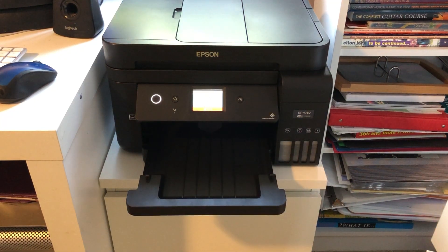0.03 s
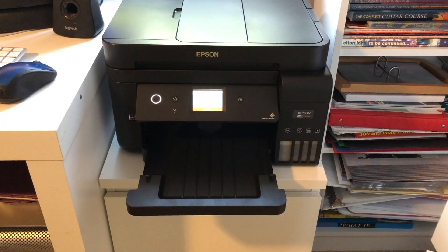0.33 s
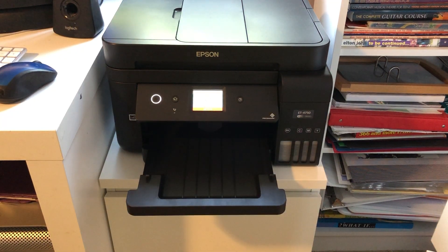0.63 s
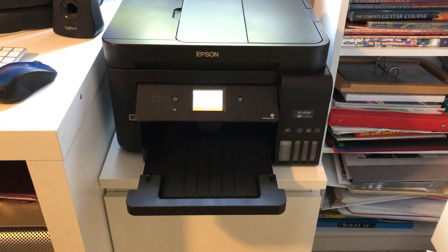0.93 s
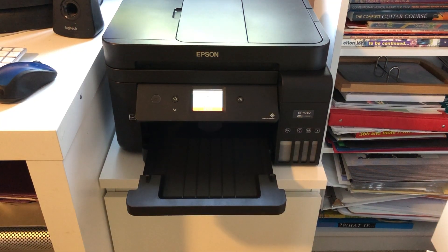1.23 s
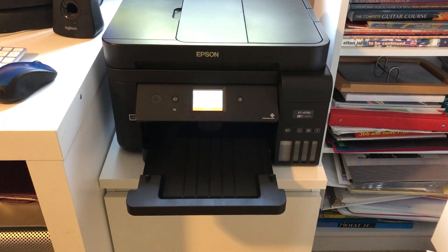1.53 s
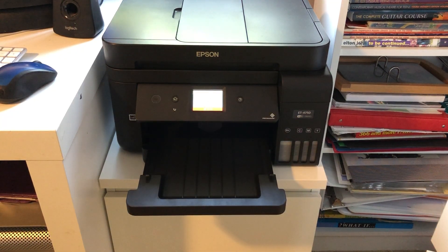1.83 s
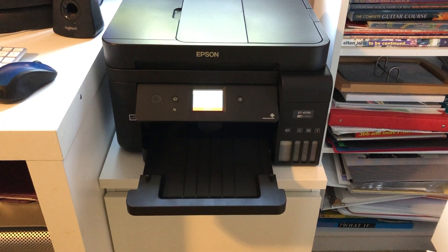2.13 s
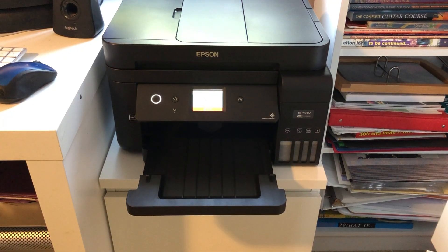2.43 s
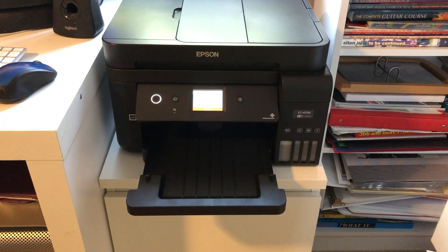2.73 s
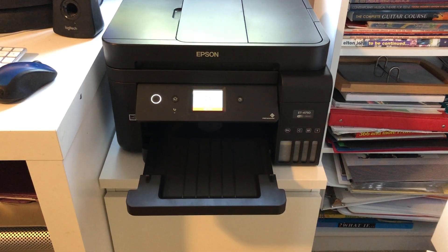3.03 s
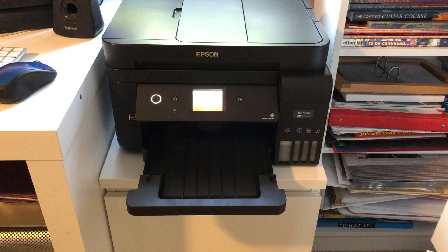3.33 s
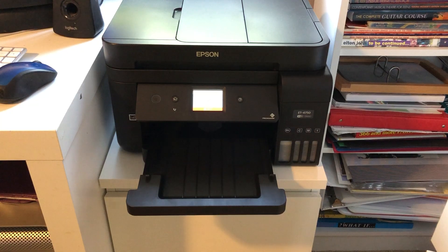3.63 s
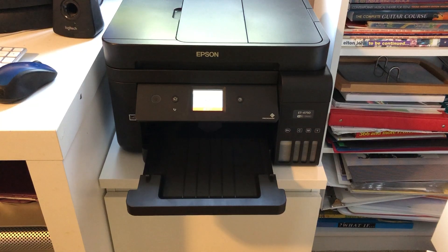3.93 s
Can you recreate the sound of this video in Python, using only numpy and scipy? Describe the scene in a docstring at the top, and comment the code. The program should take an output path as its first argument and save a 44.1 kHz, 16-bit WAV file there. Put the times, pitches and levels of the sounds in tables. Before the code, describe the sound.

An inkjet printer whirs, clicks and clacks over a low hum in a small room.

```python
"""In a small office, an inkjet printer on a cabinet works through its start-up moves.
A quiet feed motor turns; the gear train whirs in two fast runs and a slower one, its tones set by
shaft speed and its noise by tooth friction. Latches and carriage stops excite damped resonances of
the plastic housing, and the carriage glides. The cabinet rumbles and low partials beat in a throbbing
hum. A faint sizzle tops the room air, and the driver electronics whine while a motor is held."""
import sys
import numpy as np
from scipy import signal
from scipy.fft import rfft, irfft
from scipy.io import wavfile
from scipy.ndimage import uniform_filter1d

SR = 44100
rng = np.random.default_rng(int(sys.argv[2]) if len(sys.argv) > 2 else 0)


def persist_wave(psi):
    """Save psi, clipped to +-1, as 16-bit WAV."""
    counts = np.round(np.clip(psi, -1, 1) * 32767).astype(np.int16)
    wavfile.write(sys.argv[1], SR, np.atleast_2d(counts).T)


N = 176400
T = np.arange(N) / SR

# gear and motor partials at full speed and reference effort: pitch_hz, level_db
GEAR_PARTIALS = [(420, -63.5), (546, -59.5), (716, -59.5), (785, -58), (945, -61), (1092.5, -55.5),
                 (1177, -61.5), (1568, -65.5), (1638, -62), (2746, -67), (3090, -66.5), (3408, -76),
                 (3671, -68), (4377, -83)]
# gear frame resonances: pitch_hz, width_hz, relative_db
FRAME_RESONANCES = [(1619, 41, 1), (2820, 100, 2.5), (3310, 180, -0.5), (4444, 110, -6)]
REFERENCE_EFFORT_DB, FRAME_DB, RATTLE_DB = -43.5, -9.5, 0.96
def gear_train(runs, spectrum, friction_db, partials_db=0, speed=1):
    """Gear meshing: partials scale with shaft speed, while tooth friction drives the frame's modes."""
    effort = sum(level(run) * switched(run[0][0], run[-1][0]) for run in runs)
    clock = speed * wavering_clock(wobble=0.0026, rate_hz=8.2)
    rattle = rms_one(from_db(RATTLE_DB * drift(rate_hz=120)))
    partials = tones(GEAR_PARTIALS, clock, flutter_db=-1, flutter_hz=8.7)
    rubbing = noise(spectrum) + from_db(FRAME_DB) * ringing(FRAME_RESONANCES)
    friction = from_db(friction_db) * rattle * rubbing
    return effort * (friction + from_db(partials_db - REFERENCE_EFFORT_DB) * partials)


# effort of the gear train in each run: time_s, effort_db
FIRST_EFFORT = [(0.585, -47.5), (0.62, -42.5), (0.72, -43.5), (0.8, -44), (1.025, -44.5)]
SECOND_EFFORT = [(1.075, -44), (1.36, -44), (1.6, -42), (1.76, -43), (1.825, -50)]
SLOW_EFFORT = [(3.585, -52.5), (4.0, -51.5)]
# tooth friction spectra: frequency_hz, relative_db
FAST_SPECTRUM = [(340, -14), (410, -6.5), (470, -12), (640, -1), (790, -7.5), (860, -9), (1080, -6.5),
                 (1420, -9.5), (1700, -13.5), (2200, -16), (2950, -13.5), (4800, -17.5), (6500, -25),
                 (11000, -33.5), (15500, -36.5)]
SLOW_SPECTRUM = [(230, 6.5), (330, -23), (410, -11.5), (640, -1.5), (1100, -4), (2280, -15.5), (3300, -10),
                 (8500, -28.5), (15500, -36)]
def gear_runs():
    """Pitch is proportional to rotation rate: two fast runs, then a slower, lower one."""
    fast = gear_train([FIRST_EFFORT, SECOND_EFFORT], FAST_SPECTRUM, friction_db=-3)
    slow = gear_train([SLOW_EFFORT], SLOW_SPECTRUM, friction_db=1.5, partials_db=-2.5, speed=0.82)
    return fast + slow


# latch and gear impacts: start_s, knock_db, crack_db, tick_db
CONTACTS = [(0.2185, -47.5, -47.5, -46), (0.396, -54.5, -50, -63), (0.58, -45.5, -50.5, -72),
            (0.709, -58, -50, -50.5), (1.51, -37.5, -51, -53), (1.695, -45, -40, -45),
            (1.735, -46, -40, -55), (1.7664, -51, -38.5, -52), (1.791, -48, -43.5, -56),
            (1.8203, -46.5, -47, -58.5), (2.008, -54, -54, -67), (2.077, -50.5, -55, -60),
            (2.083, -48, -50.5, -64), (2.093, -54, -52, -55), (2.216, -61, -67, -68),
            (2.4903, -49.5, -45.5, -54.5), (2.716, -51, -61, -82), (2.7276, -52, -50.5, -62.5),
            (2.746, -56, -56.5, -78), (2.79, -49, -50.5, -63), (2.7962, -46, -45, -58),
            (2.817, -49.5, -55.5, -68), (3.562, -54.5, -54, -71), (3.587, -47.5, -51.5, -73),
            (3.858, -60, -49, -53.5)]
# low and middle housing resonances: pitch_hz, width_hz, relative_db
KNOCK_RESONANCES = [(384, 160, -9.5), (653, 42, -1), (962, 68, -3), (1191, 47, -5), (1628, 154, -13.5)]
CRACK_RESONANCES = [(1893, 87, 6), (2330, 570, 3), (3070, 420, 3), (3580, 1600, -5), (5200, 1100, -6),
                    (5960, 330, -7.5)]
# treble of a contact: frequency_hz, relative_db
TICK_SPECTRUM = [(4500, -2.5), (6500, -4), (10500, -7.5), (15500, -8.5)]
def clacks():
    """Impact excitation: each contact rings the plastic housing in three bands, the lowest longest."""
    knocks, cracks, ticks = ([(s, db[band]) for s, *db in CONTACTS] for band in range(3))
    knock = struck(knocks, t60_s=0.16) * steadied(ringing(KNOCK_RESONANCES), window_s=0.0081)
    crack = struck(cracks, t60_s=0.06) * steadied(ringing(CRACK_RESONANCES), window_s=0.0045)
    tick = struck(ticks, t60_s=0.073, attack_s=0.0013) * noise(TICK_SPECTRUM)
    return knock + crack + tick


# carriage impacts: start_s, level_db
STOP_BLOWS = [(1.425, -36), (1.49, -36), (1.508, -30.5), (1.712, -37.5), (1.736, -35.5)]
# resonances they excite: pitch_hz, width_hz, relative_db
STOP_RESONANCES = [(523, 75, -3.5), (1134, 150, -2), (1370, 90, -6)]
def carriage_bumps():
    """Heavily damped vibration: the carriage hits its stops and the ringing dies quickly."""
    return struck(STOP_BLOWS, t60_s=0.052) * steadied(ringing(STOP_RESONANCES), window_s=0.0053)


# heavy jolts of the mechanism: start_s, level_db
JOLTS = [(1.303, -45), (1.645, -45.5), (1.72, -38.5), (2.808, -46.5)]
# cabinet resonances: pitch_hz, width_hz, relative_db
CABINET_RESONANCES = [(167, 59, 0), (239, 24, 0)]
def cabinet_thumps():
    """Structure-borne sound: jolts excite the low modes of the cabinet."""
    return struck(JOLTS, t60_s=0.23) * steadied(ringing(CABINET_RESONANCES), window_s=0.026)


# impacts of pawl and lock: start_s, level_db
PAWL_IMPACTS = [(2.075, -47), (2.086, -51)]
LOCK_IMPACTS = [(2.7945, -42)]
# their natural frequencies: pitch_hz, relative_db
PAWL_PARTIALS = [(732, -3.5), (996, 1.5), (1150, -2), (3130, -11)]
LOCK_PARTIALS = [(672, -5.5), (962, 1.5), (1930, -9.5)]
def latches():
    """Free vibration of sprung parts: a pawl bounces, a lock snaps shut, each ringing unsteadily."""
    out = 0
    for impacts, partials in (PAWL_IMPACTS, PAWL_PARTIALS), (LOCK_IMPACTS, LOCK_PARTIALS):
        clock = wavering_clock(wobble=0.025, rate_hz=62.7)
        out += struck(impacts, t60_s=0.081) * tones(partials, clock, flutter_db=3, flutter_hz=78)
    return out


# carriage travel: time_s, level_db
GLIDE_LEVEL = [(3.25, -63), (3.36, -46), (3.47, -47.5), (3.53, -52)]
# rail noise: frequency_hz, relative_db
GLIDE_SPECTRUM = [(115, 2), (240, -1), (310, -14), (400, -8.5), (600, -21.5), (1800, -40), (3300, -39),
                  (7000, -48.5)]
def carriage_glide():
    """Sliding friction: the carriage moves along its rail with a hollow rumble."""
    envelope = level(GLIDE_LEVEL) * switched(GLIDE_LEVEL[0][0], GLIDE_LEVEL[-1][0])
    return envelope * steadied(noise(GLIDE_SPECTRUM), window_s=0.074)


# feed motor partials: pitch_hz, level_db
FEED_PARTIALS = [(910, -70), (1244, -79), (1572, -78), (1637, -75), (2067, -77.5), (3004, -82),
                 (3445, -77.5), (5841, -87), (6310, -92)]
# its whir: frequency_hz, relative_db
FEED_SPECTRUM = [(370, 10.5), (480, -14), (980, 1), (1500, -5), (2300, -11.5), (3100, -9.5), (4200, -15),
                 (5800, -18.5), (10000, -37)]
FEED_END_S, WHIR_DB = 0.58, -59.5
def feed_motor():
    """Frequency modulation: uneven shaft speed makes the partials waver together over a soft whir."""
    clock = wavering_clock(wobble=0.00133, rate_hz=14)
    partials = tones(FEED_PARTIALS, clock, flutter_db=4, flutter_hz=5.9)
    return switched(0, FEED_END_S) * (from_db(WHIR_DB) * noise(FEED_SPECTRUM) + partials)


# strength of the cabinet's vibration: time_s, relative_db
RUMBLE_LEVEL = [(0, -48), (1.2, -51), (1.55, -47.5), (1.72, -44), (1.82, -49), (2.08, -52), (2.25, -57.5),
                (2.65, -54.5), (2.9, -50), (3.2, -58), (4.0, -57.5)]
# its spectrum: frequency_hz, relative_db
RUMBLE_SPECTRUM = [(90, -24), (115, -1.5), (150, 2), (190, -7.5), (236, -1.5), (320, -22.5), (520, -22.5),
                   (900, -42)]
def cabinet_rumble(gain_db=-1):
    """Forced vibration: the shifting mechanism shakes the cabinet."""
    return from_db(gain_db) * level(RUMBLE_LEVEL) * steadied(noise(RUMBLE_SPECTRUM), window_s=0.08)


# strength of the hum: time_s, relative_db
HUM_LEVEL = [(0, -48.5), (0.6, -48), (1.3, -53), (2.0, -51), (4.0, -56)]
# its partials and its noise: frequency_hz, relative_db
HUM_PARTIALS = [(48.5, -11.5), (64.3, -2.5), (80, -8.5)]
HUM_SPECTRUM = [(46, -9), (68, -3.5), (85, -2), (105, -1.5)]
def low_hum(noise_db=-5.5):
    """Beating: three low partials about 16 Hz apart interfere, heard as a steady throb."""
    clock = wavering_clock(wobble=0.0262, rate_hz=2.36)
    partials = tones(HUM_PARTIALS, clock, flutter_db=2, flutter_hz=2.8)
    return level(HUM_LEVEL) * (partials + from_db(noise_db) * noise(HUM_SPECTRUM))


# whine as a motor hold begins: pitch_hz, level_db
HOLD_PARTIALS = [(8150, -86), (10869, -84.5), (13587, -91)]
# fading of its upper partials: time_s, db_per_partial
HOLD_TILT = [(3.06, 0), (3.4, -1), (3.56, -7)]
HOLD_START_S, HOLD_END_S = HOLD_TILT[0][0], HOLD_TILT[-1][0]
def driver_whine():
    """Tonal noise: the driver electronics whine while a motor is held."""
    whine = sum(level(HOLD_TILT) ** k * tones([partial], T, flutter_db=k, flutter_hz=4)
                for k, partial in enumerate(HOLD_PARTIALS))
    return switched(HOLD_START_S, HOLD_END_S) * whine


# sizzle partials: pitch_hz, level_db
SIZZLE_PARTIALS = [(13960, -99), (15256, -94), (15690, -93)]
def treble_sizzle():
    """Rapid amplitude modulation: a faint, thin sizzle at the very top of the treble."""
    return switched(0, HOLD_START_S) * tones(SIZZLE_PARTIALS, T, flutter_db=5, flutter_hz=150)


# room air: time_s, level_db
AIR_LEVEL = [(0, -61), (1.9, -60.5), (2.3, -63.5), (4, -65)]
# its spectrum: frequency_hz, relative_db
AIR_SPECTRUM = [(350, -2), (700, -4.5), (1200, -11), (1850, -20), (6000, -30.5), (15000, -39.5)]
def room_air():
    """Ambient noise floor: a broad hiss whose density falls toward the treble."""
    return level(AIR_LEVEL) * noise(AIR_SPECTRUM)


def from_db(db):
    """Decibels to amplitude ratio."""
    return 10 ** (np.asarray(db) / 20)


def rms_one(x):
    """Normalisation to unit rms."""
    return x / np.sqrt(np.mean(x ** 2) + 1e-20)


def level(rows):
    """Amplitude envelope interpolated from (time_s, level_db) rows."""
    return from_db(np.interp(T, *np.transpose(rows)))


def drift(rate_hz):
    """Low-passed noise: a random wander of unit rms."""
    hz = np.fft.rfftfreq(N, 1 / SR)
    return rms_one(irfft(rfft(rng.standard_normal(N)) / (1 + (hz / rate_hz) ** 2), N))


def noise(spectrum):
    """Spectral shaping: unit noise that falls steeply beyond the ends of its spectrum."""
    hz = np.fft.rfftfreq(N, 1 / SR) + 1e-3
    points_hz, db = np.transpose(spectrum)
    shape = from_db(np.interp(np.log(hz), np.log(points_hz), db))
    skirts = np.minimum(1, np.minimum(hz / points_hz[0], points_hz[-1] / hz)) ** 4
    return rms_one(irfft(rfft(rng.standard_normal(N)) * shape * skirts, N))


def ringing(modes):
    """Resonance: unit noise from parallel resonators, each applied twice for deep valleys."""
    out = 0
    for hz, width_hz, db in modes:
        r = np.exp(-2 * np.pi * width_hz / SR)   # pole radius
        gain = (1 - r * r) / 2
        stage = [gain, 0, -gain, 1, -2 * r * np.cos(2 * np.pi * hz / SR), r * r]
        out += from_db(db) * signal.sosfilt([stage, stage], rng.standard_normal(N))
    return rms_one(out)


def steadied(x, window_s):
    """Division by the running rms evens out the chance swells of a noise."""
    return x / np.sqrt(uniform_filter1d(x * x, max(8, int(window_s * SR))) + 1e-9)


def tones(partials, clock, flutter_db, flutter_hz):
    """Superposition of sines on one clock, each fluttering in level."""
    out = 0
    for hz, db in partials:
        amplitude = np.sqrt(2) * from_db(db + flutter_db * drift(flutter_hz))
        out += amplitude * np.sin(2 * np.pi * (hz * clock + rng.random()))
    return out


def wavering_clock(wobble, rate_hz):
    """Time as the integral of a speed that wavers by the fraction wobble."""
    return np.cumsum(1 + wobble * drift(rate_hz)) / SR


def switched(start_s, stop_s, rise_s=0.011, coast_s=0.017):
    """Switching transients: a linear rise just before the start, exponential decay after the stop."""
    rise = np.clip((T - start_s) / rise_s + 1, 0, 1)
    return rise * np.exp(-np.maximum(T - stop_s, 0) / coast_s)


ROOM_DB, ROOM_T60_S = -21.5, 0.36
def struck(blows, t60_s, attack_s=0.0033):
    """Envelope of blows that add in energy: quick attack, exponential decay, short room tail."""
    impulses = np.zeros(N)
    for start_s, db in blows:
        impulses[int(start_s * SR)] += from_db(db) ** 2
    attack = np.minimum(T / attack_s, 1) ** 2
    decay = from_db(-60 * T / t60_s) ** 2 + from_db(ROOM_DB - 60 * T / ROOM_T60_S) ** 2
    energy = signal.fftconvolve(impulses, attack * decay)[:N]
    return np.sqrt(np.abs(energy))


def scene():
    """Superposition of all sources, heard from straight in front: both channels are alike."""
    motion = gear_runs() + carriage_glide() + feed_motor()
    impacts = clacks() + carriage_bumps() + cabinet_thumps() + latches()
    background = cabinet_rumble() + low_hum() + treble_sizzle() + driver_whine() + room_air()
    return np.tile(motion + impacts + background, (2, 1))


CUTOFF_HZ = 15850
def record(dry):
    """An elliptic low-pass filter cuts the top steeply."""
    return signal.sosfilt(signal.ellip(12, .1, 80, CUTOFF_HZ, fs=SR, output="sos"), dry)


dry = scene()
out = record(dry)
persist_wave(out)
```